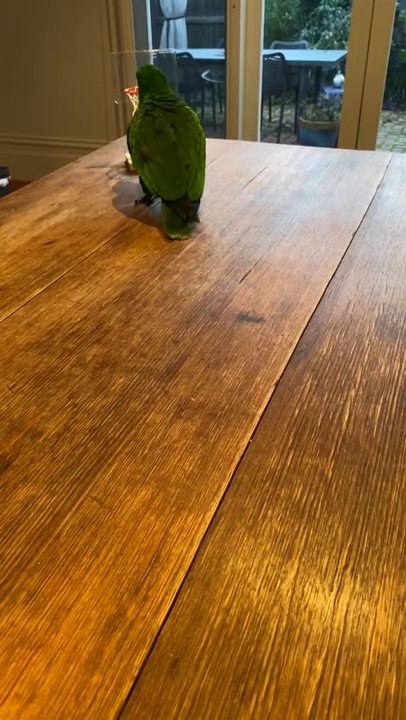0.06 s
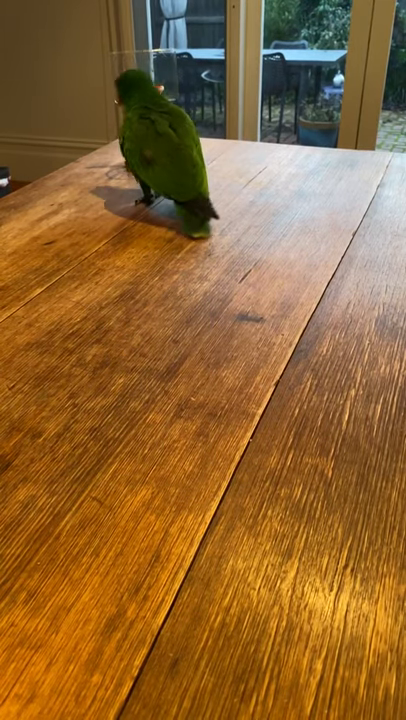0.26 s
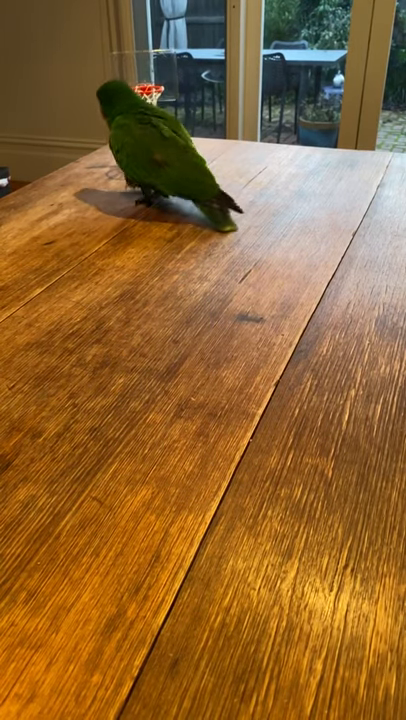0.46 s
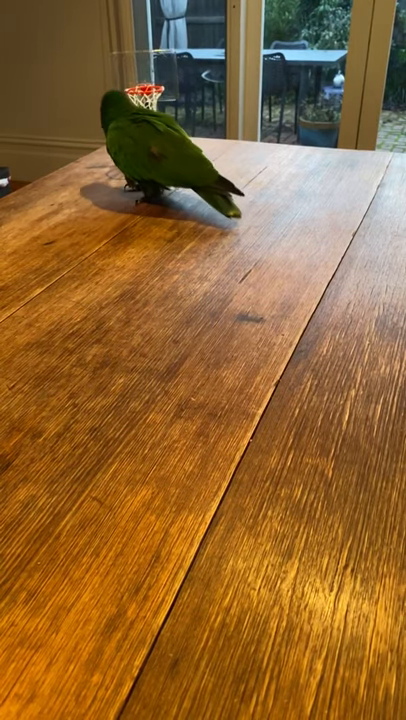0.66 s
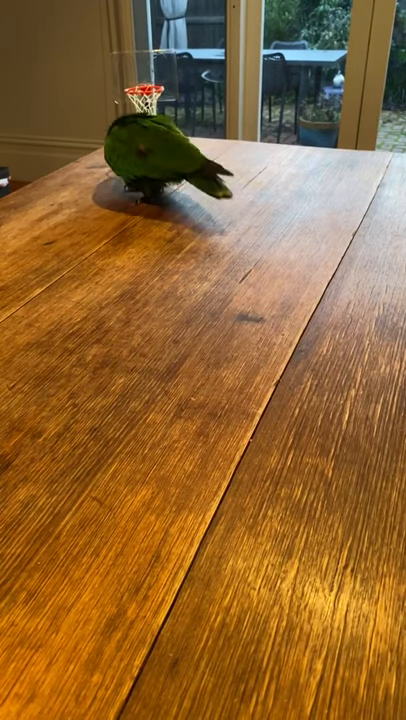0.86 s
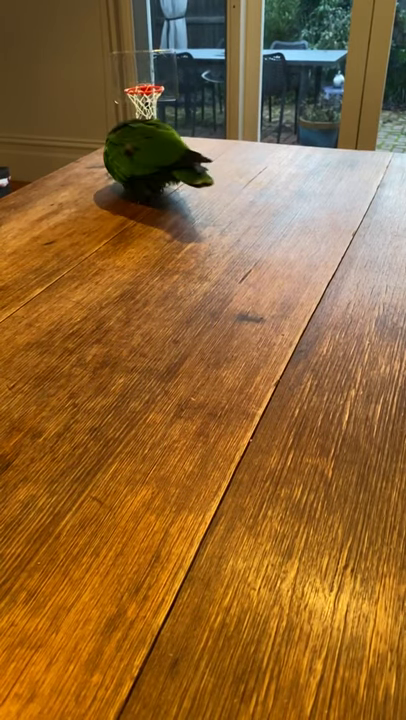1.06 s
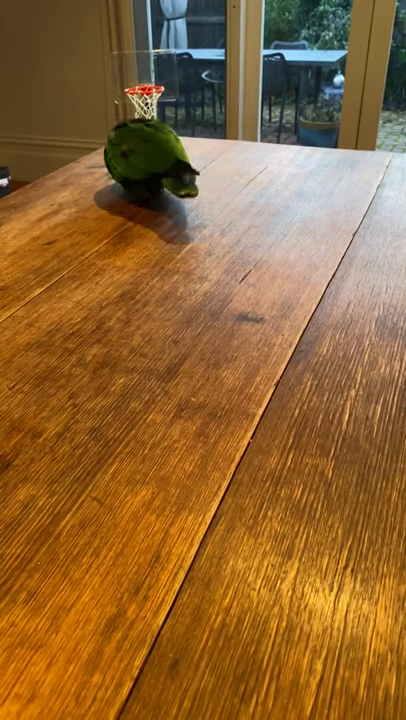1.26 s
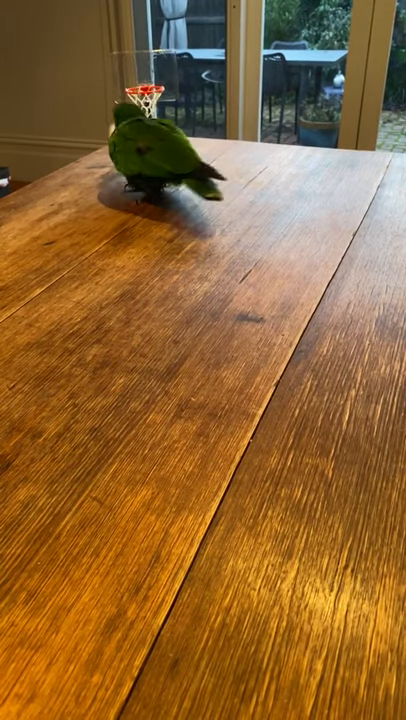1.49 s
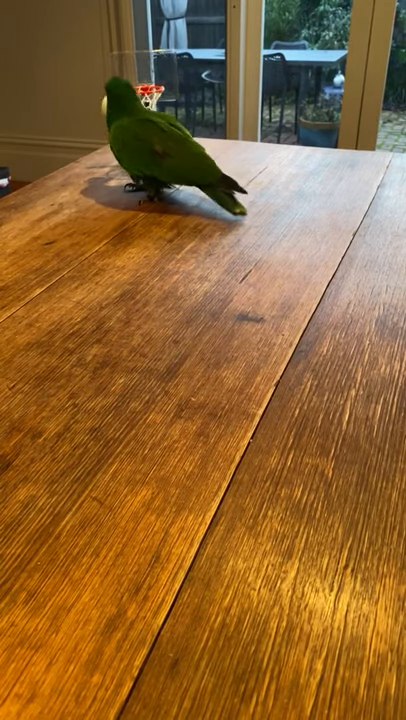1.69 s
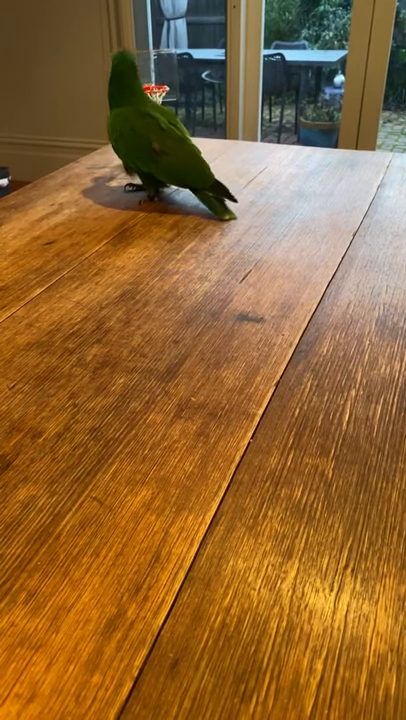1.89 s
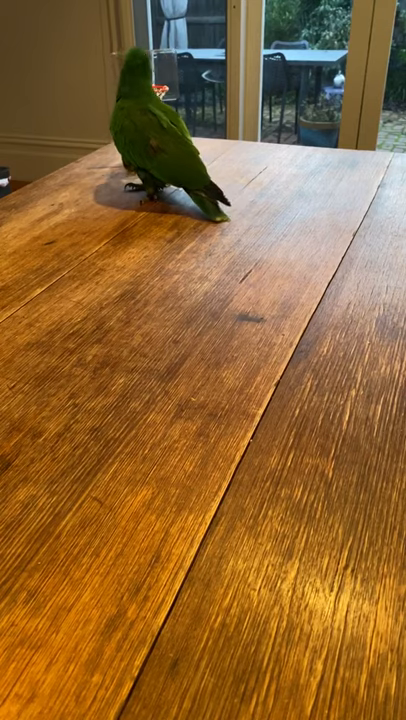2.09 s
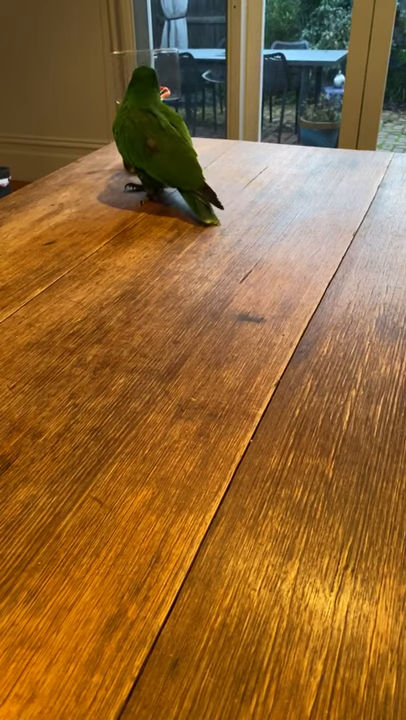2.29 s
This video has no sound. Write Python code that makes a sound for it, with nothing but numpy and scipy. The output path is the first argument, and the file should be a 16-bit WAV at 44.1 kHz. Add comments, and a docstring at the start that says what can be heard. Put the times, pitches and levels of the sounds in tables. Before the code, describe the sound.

A toy ball knocks loudly on a wooden table, then soft scuffs and a weaker clack.

```python
"""A parrot plays with a toy ball on a wooden table in a live, quiet room.
Over a fridge-like hum and faint hiss, a scuff and light taps lead to one loud knock at 0.2 s: the ball
cracks, table top and toy shell ring, the room answers. A dry claw or beak click follows at 0.8 s.
From 1.1 s the ball rubs on the wood, then the toy scrapes amid soft bumps and scuffs of feet and
feathers. At 2.1 s the toy gives a weaker, brighter clack; a few bumps, scuffs and taps end the scene."""
import sys
import numpy as np
from scipy import signal
from scipy.fft import rfft, irfft, next_fast_len
from scipy.io import wavfile
from scipy.ndimage import map_coordinates

SR = 44100
rng = np.random.default_rng(int(sys.argv[2]) if len(sys.argv) > 2 else 0)


def int16_out(signal):
    """Quantize to a 16-bit WAV file."""
    q = np.round(np.clip(np.atleast_2d(signal).T, -1, 1) * 32767)
    wavfile.write(sys.argv[1], SR, q.astype(np.int16))


N = 108045
T = np.arange(N) / SR

# modes of ball on wood, table top, toy shell (frequency [Hz], level [dB], t60 [s])
BALL_MODES = [(290, -21, 0.052), (445, -12.5, 0.032), (726, 0, 0.042), (855, -8, 0.033), (1118, -5, 0.037),
              (1468, -8.5, 0.041), (1665, -11.5, 0.043), (1943, -6, 0.039), (2485, -9.5, 0.026),
              (2910, -10, 0.027), (3960, -30, 0.019), (4260, -27.5, 0.03), (6400, -31, .006)]
TABLE_MODES = [(213, -10, .45), (262, -6, .42), (283, 0, .4), (316, -4, .42), (391, -3, .4), (402, -4, .6),
               (441, 1, .55), (473, 1, .42), (547, -5, .5), (651, -3, .62), (691, -2, .55), (862, -6, .68),
               (951, -4, .8), (1130, -7, .62), (1163, -5, .55), (1452, -11, .55), (1631, -8, .4),
               (1702, -12, .82), (1908, -13, .55)]
SHELL_MODES = [(2320, -15, .5), (2702, -17, .6), (3085, -20, .68), (4100, -27, .55), (5100, -30, .5),
               (5990, -27, .45), (6540, -29, .45)]
# spectra of contact tick, room wash, frame boom (frequency [Hz], level [dB])
TICK_SPECTRUM = [(1000, -25), (3500, -2), (6500, 1.5), (9000, -16), (11000, -20), (15000, -22)]
WASH_SPECTRUM = [(30, -47), (130, -15.5), (260, -1), (480, -4.5), (780, -3.5), (1130, -4), (1300, -11),
                 (1700, -7.5), (2100, -12), (2800, -15.5), (3600, -20), (4800, -25.5), (6600, -26.5),
                 (8200, -41), (10000, -50), (15000, -49.5)]
FRAME_SPECTRUM = [(25, -39), (48, -5), (100, 0.5), (180, 1), (350, -21.5), (1000, -75)]
# first reflections off window and walls (delay [s], level [dB])
REFLECTIONS = [(0.0084, -13), (0.0199, -9), (0.0255, -16), (0.0415, -14)]


def knock(time_s=0.2084, contact_s=0.00062):
    """The ball hits: a hollow crack, table top and shell ring, the frame booms, the room answers."""
    tick = amp(-33.5) * noise(TICK_SPECTRUM) * fade(t60_s=0.0083)
    crack = (amp(-12.5) * ring(BALL_MODES) + tick) * rise(contact_s)
    echoes = sum(at(delay_s, amp(db) * crack) for delay_s, db in REFLECTIONS)
    ringing = amp(-28.5) * ring(TABLE_MODES + SHELL_MODES, any_phase=True) * rise(0.0071)
    wash = amp(-26.5) * room_tail(WASH_SPECTRUM) * rise(0.0034)
    boom = amp(-34.5) * noise(FRAME_SPECTRUM) * rise(0.037) * fade(t60_s=0.5)
    return at(time_s, crack + echoes + ringing + wash + boom)


# light contacts (time [s], level [dB], tilt [dB/octave])
TAP_HITS = [(0.0503, -49, 2), (0.202, -51, 3.5), (1.0266, -50.5, 2.5), (1.266, -53, -6), (2.209, -47.5, 1),
            (2.434, -46, 0.5), (2.441, -47.5, 0)]
# tapped wood (frequency [Hz], level [dB])
TAP_SPECTRUM = [(60, -33), (300, -12), (650, -2.5), (880, 2.5), (1100, -3.5), (1370, -13.5), (1700, -8),
                (2150, -9.5), (2500, -14.5), (3000, -23.5), (4200, -18.5), (6000, -26), (8000, -38),
                (11000, -57)]


def taps(rise_s=0.0007, t60_s=0.026, room_db=-12):
    """Light contacts with the wood, each a noise burst with its echo."""
    track = np.zeros(N)
    for time_s, db, tilt in TAP_HITS:
        burst = noise(TAP_SPECTRUM, tilt) * fade(t60_s)
        echo = amp(room_db) * room_tail(TAP_SPECTRUM, tilt)
        track += at(time_s, amp(db) * rise(rise_s) * (burst + echo))
    return track


# struck toy piece (frequency [Hz], level [dB], t60 [s])
TOY_MODES = [(1150, -2, .3), (2210, -9, .3), (3050, -4, .35), (4890, -3, .45), (5080, -6, .3),
             (6240, -1, .55), (6390, -5, .45), (7340, -8, .3)]
# bright snap, also the echo of the clicks (frequency [Hz], level [dB])
SNAP_SPECTRUM = [(200, -12), (1150, 1.5), (1700, -6.5), (2750, -10), (3050, -7), (3400, -7), (4600, -9),
                 (5000, 4.5), (5800, -5), (6300, 1.5), (6900, -6), (7350, -4.5), (8000, -10), (8500, -17.5),
                 (15000, -33)]


def clack(time_s=2.141, level_db=-52):
    """A hard piece of the toy is struck and rings briefly."""
    snap = noise(SNAP_SPECTRUM) * fade(t60_s=0.025)
    echo = amp(-3) * room_tail(SNAP_SPECTRUM)
    ringing = amp(-6) * ring(TOY_MODES, any_phase=True)
    return at(time_s, amp(level_db) * (snap + echo + ringing))


# claw or beak contacts (time [s], level [dB])
CLICK_HITS = [(0.7842, -43.5), (0.7849, -56)]
# their ring (frequency [Hz], level [dB], t60 [s])
CLICK_MODES = [(2000, -9, .002), (3200, -1, 0.0026), (5460, 1, .004), (7240, -2.5, 0.0037)]


def clicks(rise_s=0.0001, room_db=-27.5):
    """Claw or beak makes a tiny dry double click with a trace of room."""
    click = ring(CLICK_MODES) * rise(rise_s)
    return sum(at(time_s, amp(db) * (click + amp(room_db) * room_tail(SNAP_SPECTRUM)))
               for time_s, db in CLICK_HITS)


# brushing strokes (peak time [s], level [dB], rise [s], tilt [dB/octave])
SCUFF_STROKES = [(0.04, -56, 0.14, -4.5), (0.441, -55, 0.018, -1), (1.52, -61.5, 0.15, -8),
                 (1.61, -63.5, .04, -7), (1.735, -66.5, 0.017, -1), (1.791, -66, 0.023, -3.5),
                 (2.18, -54.5, 0.066, -13), (2.385, -61, 0.026, -4.5)]
# brushed wood (frequency [Hz], level [dB])
SCUFF_SPECTRUM = [(100, -2), (500, -10), (1100, -0.5), (4000, 1.5), (7000, -4), (9000, -14.5), (11000, -27),
                  (15000, -21)]


def scuffs():
    """Feet and feathers brush the table in grainy swells of noise."""
    return sum(amp(db) * brush(peak_s, rise_s, t60_s=0.6, grain_db=1.5) * noise(SCUFF_SPECTRUM, tilt)
               for peak_s, db, rise_s, tilt in SCUFF_STROKES)


# scraping toy (frequency [Hz], level [dB])
SCRAPE_SPECTRUM = [(200, -6), (480, 2), (800, -1), (1150, 2), (1600, -12), (2450, 0), (2900, -18),
                   (4000, -16), (7000, -26), (10000, -42)]


def scrape(level_db=-58):
    """The toy scrapes once: short, grainy friction noise."""
    envelope = brush(peak_s=1.479, rise_s=0.029, t60_s=0.24, grain_db=1.7)
    return amp(level_db) * envelope * noise(SCRAPE_SPECTRUM)


# ball rubbing on the table (peak time [s], level [dB], half length [s])
RUB_STROKES = [(1.139, -50, 0.021), (1.24, -54, 0.019), (1.299, -45, 0.034)]
# friction grit (frequency [Hz], level [dB])
GRIT_SPECTRUM = [(80, -13), (220, 2), (400, 8), (560, -7.5), (830, -2.5), (1100, -19), (1500, -39),
                 (5000, -63.5)]


def rubs(mode_hz=288, wander_hz=3.6, grit_db=-7.5, grit_spread=1.75):
    """Friction sets a low mode of the table top singing, over a dull grit."""
    tone = sine(mode_hz + wander_hz * wobble(40.3))
    grit = amp(grit_db) * noise(GRIT_SPECTRUM)
    swell = lambda peak_s, half_s: np.exp(-((T - peak_s) / half_s) ** 2)
    return sum(amp(db) * (tone * swell(peak_s, half_s) + grit * swell(peak_s, half_s * grit_spread))
               for peak_s, db, half_s in RUB_STROKES)


# soft thuds (time [s], level [dB], frequency [Hz], t60 [s])
BUMP_HITS = [(0.226, -30, 86.4, 0.068), (0.279, -33, 106, 0.091), (1.15, -53, 74, 0.2),
             (1.393, -39, 301, 0.045), (1.482, -38.5, 132, 0.072), (1.525, -49, 164, 0.25),
             (1.633, -48.5, 69.4, 0.33), (2.17, -46, 570, 0.07), (2.184, -46.5, 440, 0.11),
             (2.269, -48.5, 57.4, 0.3)]


def bumps(rise_s=0.0018):
    """Soft low thuds, one damped mode each."""
    return sum(at(time_s, ring([(hz, db, t60_s)]) * rise(rise_s)) for time_s, db, hz, t60_s in BUMP_HITS)


# appliance partials (frequency [Hz], rms level [dB])
HUM_PARTIALS = [(59, -72.5), (156, -66), (199, -66.5), (296, -63.5), (345, -69), (398, -73.5), (444, -82),
                (493, -74.5), (592, -79), (690, -80)]


def hum(waver_db=3, wander_hz=1.47):
    """An appliance hums; each partial wavers in level and pitch."""
    return sum(amp(db + waver_db * wobble(8.13)) * sine(hz + wander_hz * wobble(7.01))
               for hz, db in HUM_PARTIALS)


# room air (frequency [Hz], level [dB])
AIR_SPECTRUM = [(20, -46), (32, -5), (48, 5), (80, 1.5), (170, -4), (300, -0.5), (500, -10), (1000, -17),
                (2000, -23.5), (4000, -27), (6500, -30), (8200, -37), (10000, -46), (13000, -36),
                (15700, -46)]


def air(level_db=-57):
    """Steady room air: low rumble and faint hiss."""
    return amp(level_db) * noise(AIR_SPECTRUM)


# reverberation time (frequency [Hz], t60 [s])
ROOM_T60 = [(60, 0.97), (300, 0.84), (900, 0.87), (2500, 0.84), (5000, 0.67), (8000, 0.55), (14000, .4)]


def room_tail(spectrum, tilt_db=0):
    """Diffuse echo: each frequency dies at its own speed."""
    hz, t, bands = signal.stft(noise(spectrum, tilt_db), SR, nperseg=256)
    decay = fade(along(ROOM_T60, hz)[:, None], t)
    return signal.istft(bands * decay, SR)[1][:N]


def ring(modes, any_phase=False):
    """Damped sines: neighbours swing opposite ways, or arrive in any phase through the room."""
    phases = rng.uniform(0, 2 * np.pi, len(modes)) if any_phase else np.pi * np.arange(len(modes))
    return sum(amp(db) * fade(t60_s) * np.sin(2 * np.pi * hz * T + phase)
               for (hz, db, t60_s), phase in zip(modes, phases))


def noise(spectrum, tilt_db=0):
    """Coloured noise of rms 1, tilted by tilt_db per octave above 250 Hz."""
    gain = lambda hz: amp(along(spectrum, hz) + tilt_db * np.log2(np.maximum(hz, 250) / 250))
    x = filtered(rng.standard_normal(N), gain)
    return x / np.sqrt(np.mean(x ** 2) + 1e-20)


def sine(hz):
    """Sine of rms 1 following a frequency curve."""
    return np.sqrt(2) * np.sin(2 * np.pi * np.cumsum(hz) / SR)


def brush(peak_s, rise_s, t60_s, grain_db):
    """Grainy envelope that swells to peak_s and dies away."""
    grain = amp(grain_db * wobble(150))
    swell = np.exp(-(np.minimum(T - peak_s, 0) / rise_s) ** 2)
    return grain * swell * fade(t60_s, np.maximum(T - peak_s, 0))


def fade(t60_s, t=T):
    """Exponential decay."""
    return np.exp(-np.log(1000) * t / t60_s)


def rise(rise_s):
    """Soft onset."""
    return 1 - np.exp(-T / rise_s)


def wobble(knots_per_s):
    """Smooth random curve."""
    return map_coordinates(rng.standard_normal(256), [T * knots_per_s + 2], mode="wrap")


def filtered(x, response):
    """Apply a gain given as a function of frequency."""
    size = next_fast_len(N + SR // 2)
    return irfft(rfft(x, size) * response(np.fft.rfftfreq(size, 1 / SR)), size)[:N]


def along(points, hz):
    """Interpolate (frequency, value) points on a log axis."""
    knots_hz, values = np.transpose(points)
    return np.interp(np.log(hz + 1), np.log(knots_hz + 1), values)


def at(time_s, x):
    """Start x at time_s."""
    return np.pad(x, (max(round(time_s * SR), 0), 0))[:N]


def amp(db):
    """Decibels to gain."""
    return 10 ** (np.asarray(db) / 20)


def scene():
    """All sources, heard in mono above the table."""
    parrot = knock() + taps() + clack() + clicks() + scuffs() + scrape() + rubs() + bumps()
    return (parrot + hum() + air())[None]


def record(dry, top_hz=15800):
    """Cut everything above top_hz."""
    return np.array([filtered(channel, lambda hz: hz < top_hz) for channel in dry])


dry = scene()
out = record(dry)
int16_out(out)
```